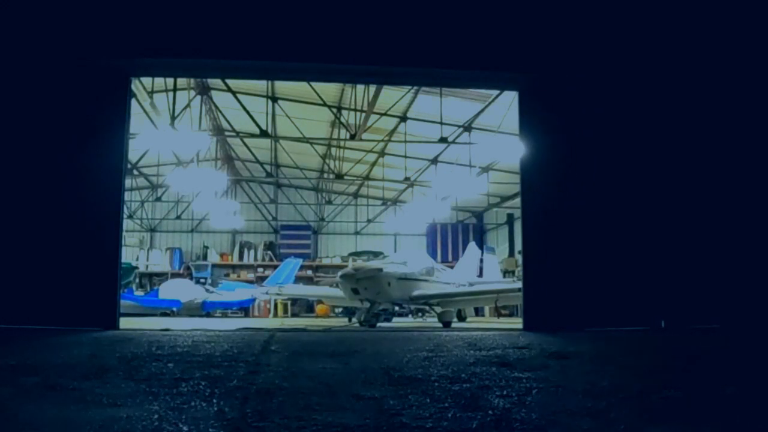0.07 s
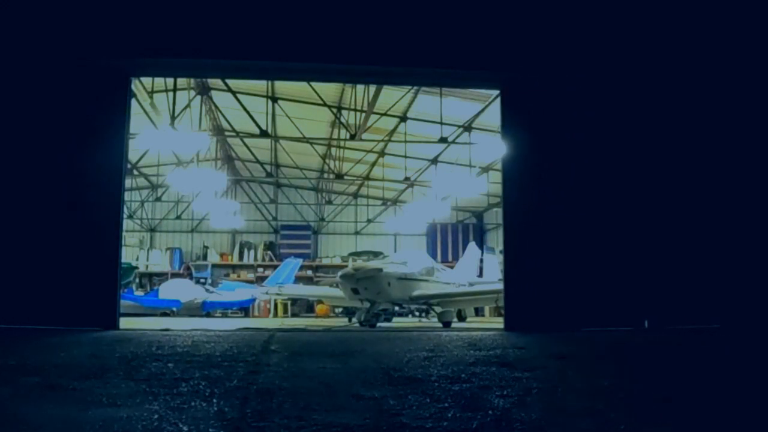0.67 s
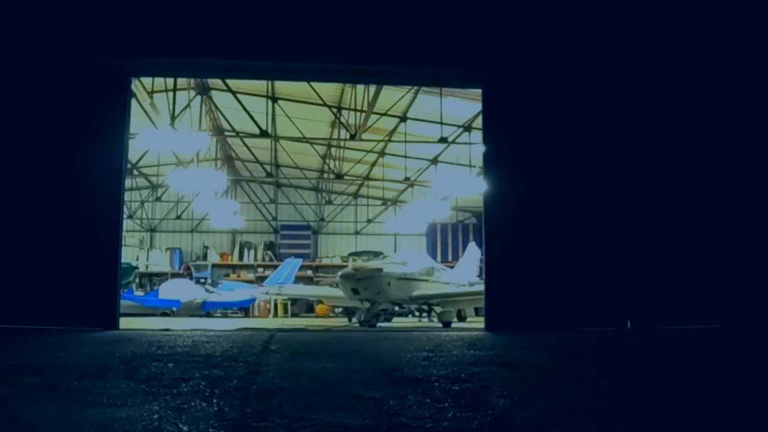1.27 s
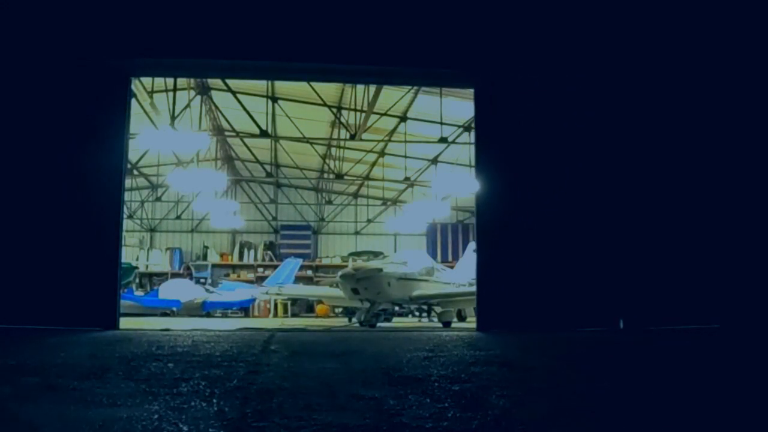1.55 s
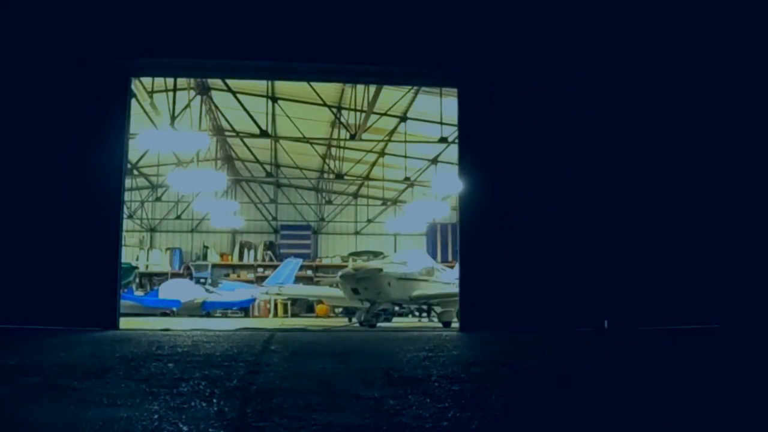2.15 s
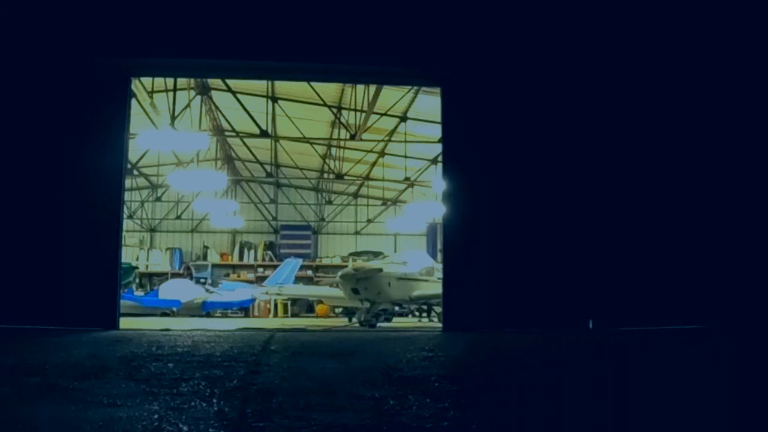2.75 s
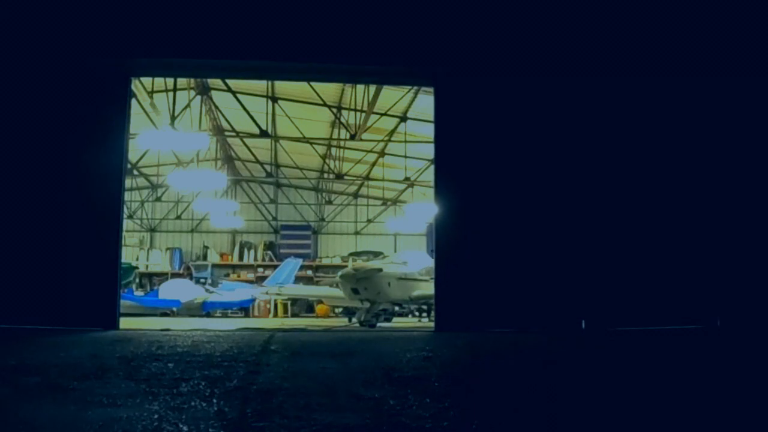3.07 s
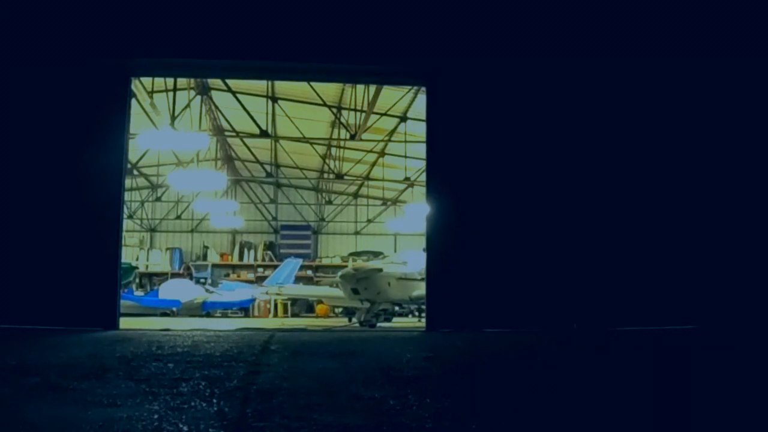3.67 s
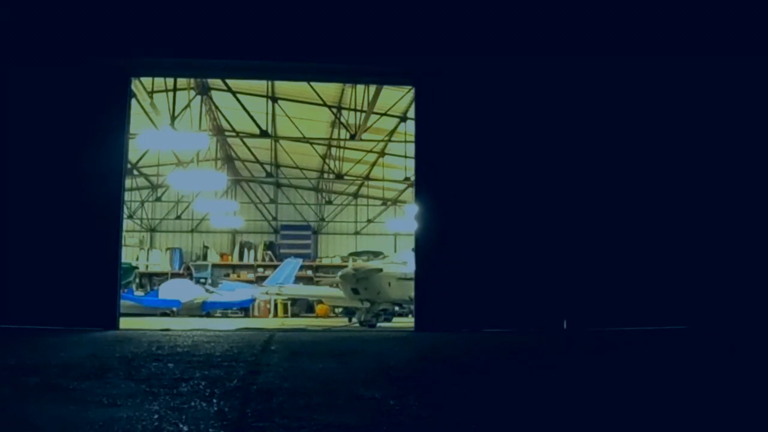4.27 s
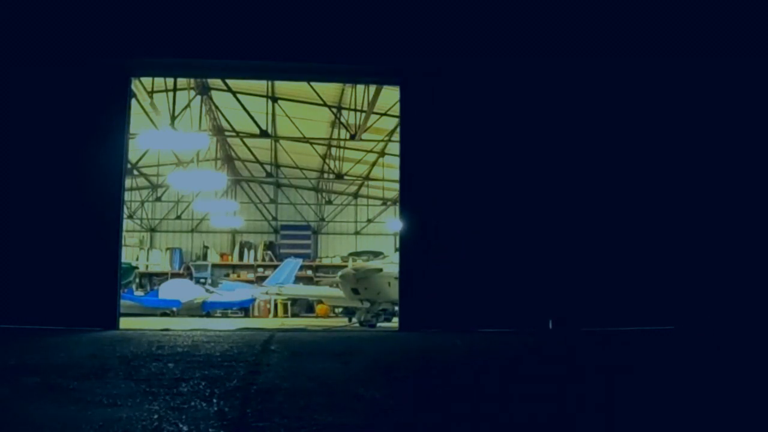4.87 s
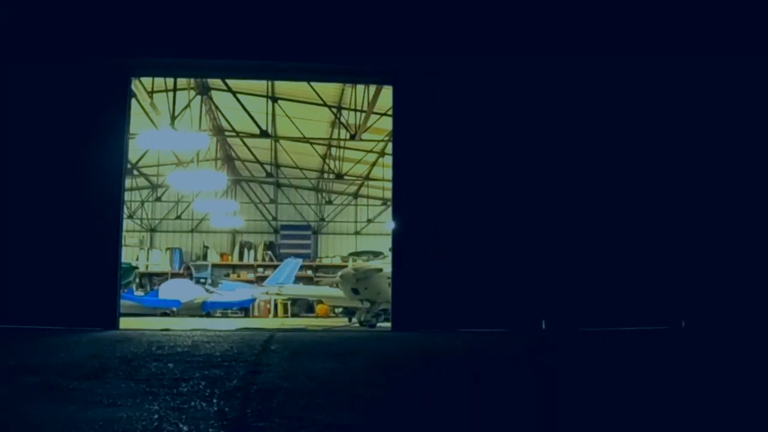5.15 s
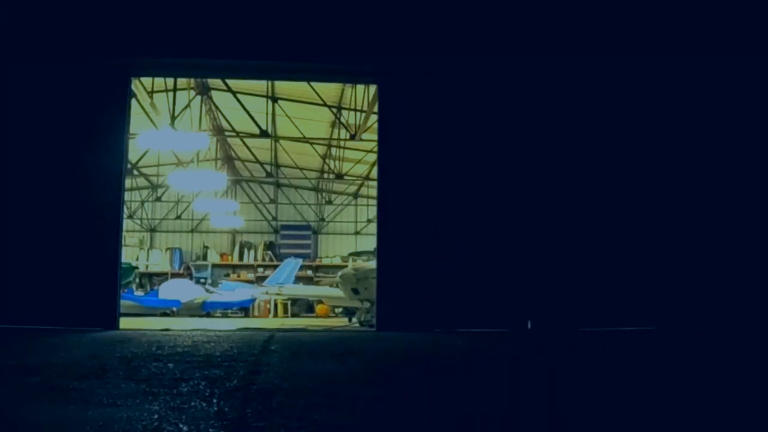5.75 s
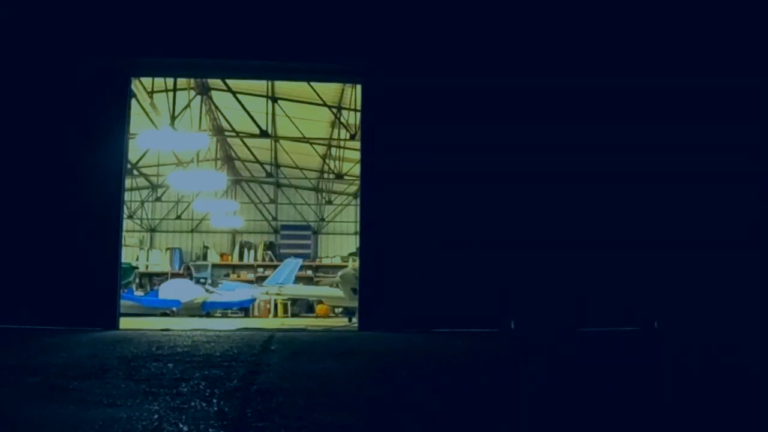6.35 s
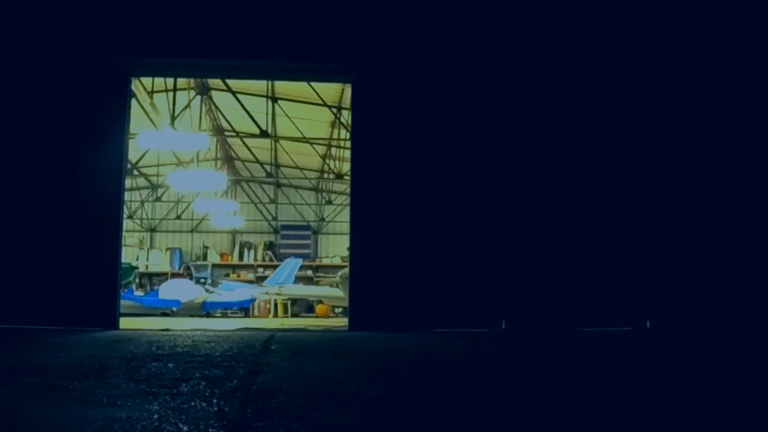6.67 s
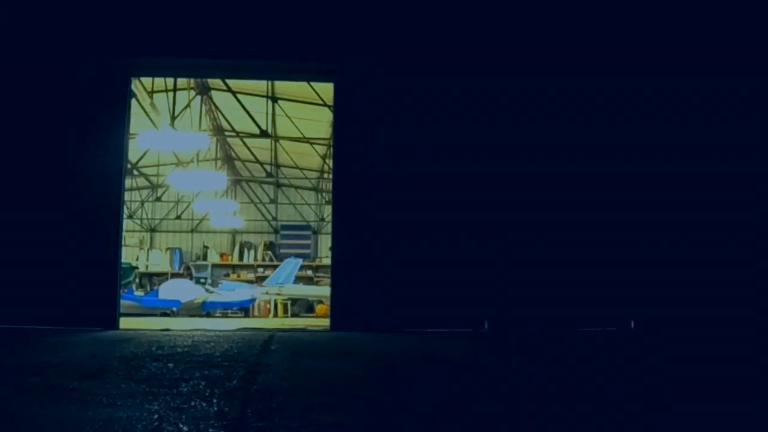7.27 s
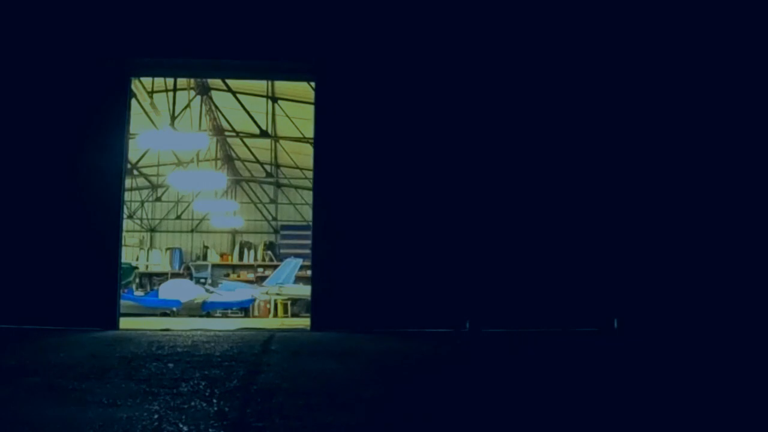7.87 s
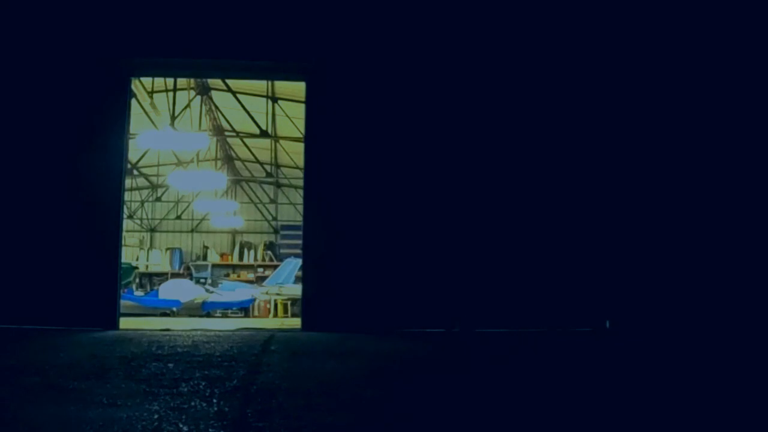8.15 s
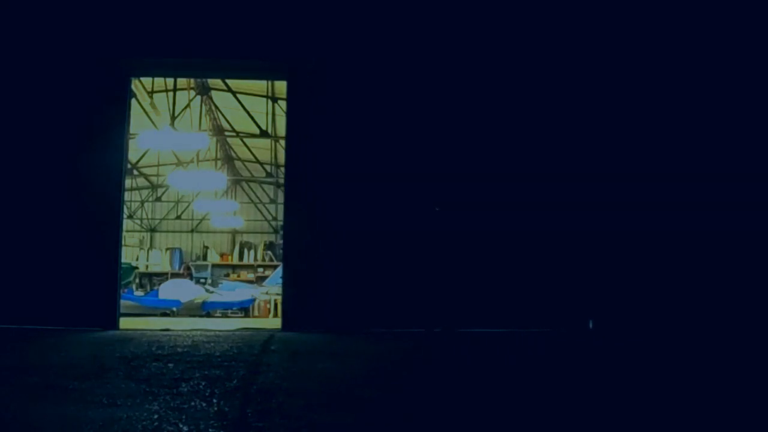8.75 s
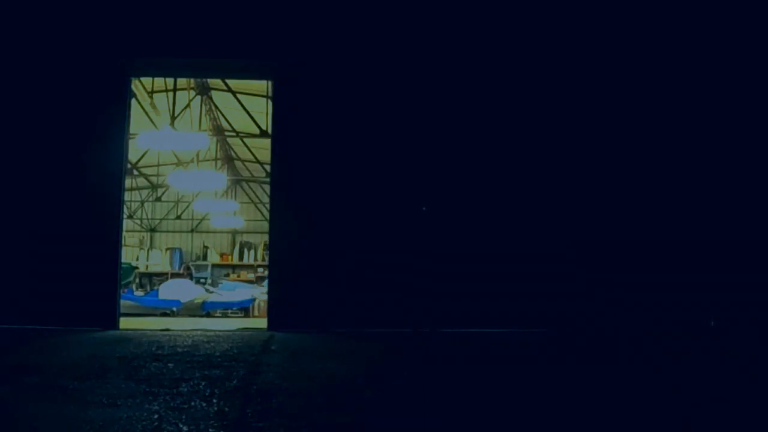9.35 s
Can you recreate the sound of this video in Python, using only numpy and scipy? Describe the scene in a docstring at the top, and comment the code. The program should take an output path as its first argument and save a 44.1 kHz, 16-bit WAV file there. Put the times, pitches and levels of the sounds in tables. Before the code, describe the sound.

A tall sheet-steel hangar door rolls shut, heard from some way off. From the start there is a deep, throbbing rumble, with thin panels drumming and a loose sheet humming. The wheels crush grit on the floor track in uneven crackles and crunches. At about 3.1 seconds they hit a rail joint with a sharp, rattling cluster of clanks, and the panels boom. A lighter cluster follows at 5.2 seconds, then a dull knock at 6. Around 6.3 seconds the close crackle drops away, and the softer, duller grinding of the far wheels takes over, joined by a very faint, high squeal from about 7 seconds. At 9 seconds another ringing clank and short rattle jolt the door, which is still rumbling at 9.5 seconds. The large hall echoes everything except the deepest rumble.

```python
"""A low, throbbing rumble with gritty crackle: a tall sheet-steel hangar door rolls shut, some way off.
Its wheels shake the panels, crush grit on the floor track and clank over the rail joints.
Then the near wheels reach clean rail, and the duller grinding of the far wheels takes over,
with a faint squeal. The hall echoes everything but the deepest rumble."""
import sys
import numpy as np
from scipy import signal
from scipy.fft import rfft, irfft
from scipy.io import wavfile
from scipy.ndimage import uniform_filter1d

SR = 44100
rng = np.random.default_rng(int(sys.argv[2]) if len(sys.argv) > 2 else 0)


def output_pcm(signal):
    """Save a mono or channel-first signal as 16-bit PCM at the path in sys.argv[1].

    Samples are clipped to [-1, 1] before scaling.
    """
    pcm = np.clip(np.atleast_2d(signal).T, -1, 1) * 32767
    wavfile.write(sys.argv[1], SR, np.round(pcm).astype(np.int16))


N = 419391
T = np.arange(N) / SR


def undb(db):
    """Turn decibels into a number to multiply by."""
    return 10 ** (np.asarray(db) / 20)


def unit(x):
    """Scale to an average strength (rms) of 1."""
    return x / np.sqrt(np.mean(x ** 2))


def curve(rows):
    """Join (time, value) points with straight lines."""
    return np.interp(T, *np.transpose(rows))


def ramp(middle_s, length_s):
    """Rise from 0 to 1 around a moment."""
    return np.clip((T - middle_s) / length_s + .5, 0, 1)


def wander(rate):
    """Glide to a new random value, rate times a second."""
    step = int(SR / rate)
    held = np.repeat(rng.standard_normal(N // step + 1), step)
    return unit(uniform_filter1d(held, step)[:N])


def add(out, start_s, x):
    """Mix x into out from start_s on."""
    i = int(start_s * SR)
    out[i:i + len(x)] += x[:N - i]


def at_hz(hz, points):
    """Read between (frequency, value) points, spaced by octaves."""
    known_hz, value = np.transpose(points)
    return np.interp(np.log(np.maximum(hz, 1)), np.log(known_hz), value)


def colour(x, tone, tilt_db=0, size=8192):
    """Filter x by a tone table, fading past its ends; tilt_db per octave tips the treble."""
    hz = np.maximum(np.arange(size // 2 + 1) * SR / size, 1)
    octaves_outside = np.abs(np.log2(hz / np.clip(hz, tone[0][0], tone[-1][0])))
    db = at_hz(hz, tone) - 20 * octaves_outside + tilt_db * np.log2(np.maximum(hz, 1000) / 2000)
    # Fold the filter so that nothing sounds before the hit that causes it.
    cepstrum = irfft(np.log(undb(db)))
    cepstrum[1:size // 2] *= 2
    cepstrum[size // 2 + 1:] = 0
    return signal.fftconvolve(x, irfft(np.exp(rfft(cepstrum))))[:len(x)]


def resonate(x, hz, width_hz):
    """Keep one band of x, so it rings at that pitch."""
    return signal.lfilter(*signal.iirpeak(hz, hz / width_hz, fs=SR), x)


def grains(rate, spread_db):
    """Tiny random impacts, about rate a second, a few much harder than the rest."""
    hits = rng.random(N) < rate / SR
    return hits * rng.choice([-1, 1], N) * undb(spread_db * np.minimum(rng.exponential(size=N), 5))


def chatter(length_s, rise_s=0.002):
    """A quick run of tiny contacts that stops short."""
    t = T[:SR // 10]
    shape = (1 - np.exp(-t / rise_s)) * np.exp(-(t / length_s) ** np.sqrt(2) / 2)
    burst = rng.standard_normal(len(t)) * shape
    return burst / np.linalg.norm(burst)


def struck(x, tone, tilt_db, peak_hz, boost_db, sharpness=4.7):
    """A struck part colours the blow x and favours one pitch."""
    response = colour(signal.unit_impulse(2048), tone, tilt_db)
    response = response + (undb(boost_db) - 1) * resonate(response, peak_hz, peak_hz / sharpness)
    return signal.fftconvolve(x, response / np.linalg.norm(response)) * np.sqrt(SR / 100)


# The hall's echo. Each row: frequency in Hz, seconds to fade by 60 dB, level in dB.
HALL_ECHO = [(125, 1.35, 2), (500, 1.45, 0), (1000, 1.55, -2.5), (1980, 1.06, -4), (3980, 1.15, -5),
             (8000, 2, -4.5), (15700, .7, -6.5)]
def hall_tail(build_s=0.026):
    """Echoes build up between floor, walls and roof; each octave fades at its own speed."""
    t = T[:SR]
    noise = rfft(rng.standard_normal(len(t)))
    octave = np.log2(np.clip(np.arange(len(noise)) * SR / len(t), 125, 16000) / 125)
    tail = 0
    for k in range(8):
        fade_s, db = (at_hz(125 * 2 ** k, np.array(HALL_ECHO)[:, [0, c]]) for c in (1, 2))
        fade = undb(-60 * t / fade_s) * (1 - np.exp(-t / build_s))
        band = irfft(noise * np.maximum(1 - np.abs(octave - k), 0))
        tail = tail + band * fade * undb(db) / np.linalg.norm(fade)
    return tail


def hall(x):
    """The echo pattern keeps changing as the door travels."""
    out, hop = np.zeros(N), SR // 2
    window = np.sqrt(np.hanning(2 * hop))
    for i in range(-hop, N, hop):
        start, end = max(i, 0), min(i + 2 * hop, N)
        piece = x[start:end] * window[start - i:end - i]
        add(out, start / SR, signal.fftconvolve(piece, hall_tail()))
    return out


# Thin squeals. Each row: start and end in seconds, pitch in Hz, relative level in dB.
SQUEALS = [(6.85, 7.6, 4950, -82), (7.697, 9.0, 3840, -74.5), (8.203, 9.0, 4730, -82),
           (8.4, 9.4, 5670, -85)]
def squeals(fade_s=.3, waver_db=2):
    """A wheel's rim rubs the rail and keeps the wheel ringing."""
    out, rubbing = np.zeros(N), rng.standard_normal(N)
    for start, end, hz, db in SQUEALS:
        ring = unit(resonate(rubbing, hz, width_hz=150))
        fade = ramp(start, fade_s) * (1 - ramp(end, fade_s))
        out += undb(db + waver_db * wander(8)) * ring * fade
    return out


# The tone of the distant grinding. Each row: frequency in Hz, level in dB.
FAR_TONE = [(250, -3.5), (500, -1.5), (720, -0.5), (930, -4.5), (1150, -3.5), (1750, -7.5), (2000, -9),
            (2700, -13), (3100, -12.5), (3600, -19.5), (3900, -17), (4150, -24.5), (4900, -28),
            (7500, -48.5)]
# Patches of grit. Each row: middle in seconds, reach to either side in seconds, extra level in dB.
GRIT_PATCHES = [(7.27, 0.12, 1), (7.78, 0.2, 3.5), (7.98, .06, 3), (8.28, .06, 2), (8.47, 0.082, 3.2),
                (8.85, .05, 1.5)]
def far_wheels():
    """Distant wheels grind on, dull at first, then louder and brighter as they meet more grit."""
    patch_db = sum(db * np.exp(-((T - s) / reach_s) ** 2) for s, reach_s, db in GRIT_PATCHES)
    level_db = -54 + 5 * ramp(middle_s=6.3, length_s=1.3) + patch_db
    treble_db = -17 + 15.5 * ramp(middle_s=6.82, length_s=.5)
    grit = unit(colour(grains(3500, 2.0) * undb(1.7 * wander(25)), FAR_TONE))
    treble = signal.sosfiltfilt(signal.butter(3, 2000, "high", fs=SR, output="sos"), grit)
    return (grit + (undb(treble_db) - 1) * treble) * undb(level_db)


# A loose sheet's hum. Each row: time in seconds, relative level in dB.
SHEET_LEVELS = [(0, -47.5), (1.3, -51), (1.55, -41.5), (1.85, -51), (3.1, -54.5), (3.25, -37), (3.7, -53),
                (5.15, -53), (5.3, -39.5), (5.95, -47.5), (6.5, -40.5), (6.7, -49), (7.0, -43),
                (7.4, -48.5), (8.1, -46), (8.9, -52), (9.1, -42), (9.5, -50)]
def loose_sheet(hz=270.8, width_hz=26):
    """One loose sheet of the door's skin hums at its own pitch."""
    hum = resonate(rng.standard_normal(N), hz, width_hz)
    hum = resonate(hum, hz, width_hz)  # a second pass narrows the band
    strength = np.sqrt(uniform_filter1d(hum ** 2, SR // 5) + 1e-12)
    return unit(hum / strength) * undb(curve(SHEET_LEVELS))


# The notes of track and frame. Each row: pitch in Hz, relative level in dB,
# seconds to fade by 60 dB when ringing freely.
STEEL_NOTES = [(389, -2, .6), (572, -2.5, .7), (606, -2.5, 1.2), (720, -7, 0.43), (850, -6.5, 1.2),
               (1040, -4.5, .6), (1148, -1.5, 0.92), (1206, -2.5, 1.1), (1360, -5, .7), (1490, -3, .7),
               (1618, 1.5, .4), (1690, -3, .9), (1775, -4.5, .8), (2097, -3, 1.3), (2448, -1.5, .6),
               (2780, -9.5, .5), (3200, -4.5, .7), (3800, -6, .5), (4130, -5.5, 0.45), (4960, -3.5, .5)]
def shaken_steel(x, ring_db, damping_s, wander_db):
    """Shaking sets the steel ringing; the wheels damp it and favour other notes as they travel."""
    out = x
    for hz, db, fade_s in STEEL_NOTES:
        width_hz = (1 / damping_s + np.log(1000) / fade_s) / np.pi
        out = out + undb(ring_db + db + wander_db * wander(3)) * resonate(x, hz, width_hz)
    return out


def clang(struck_hz, reach_octaves=0.62, scatter_db=2.5, rise_s=0.0031):
    """The steel rings on after a blow, most in the notes near the struck part's pitch."""
    out, t = 0, T[:SR]
    for hz, db, fade_s in STEEL_NOTES:
        luck, phase = rng.standard_normal(2)
        closeness = np.exp(-(np.log2(hz / struck_hz) / reach_octaves) ** 2)
        note = np.sin(2 * np.pi * (hz * t + phase))
        out = out + closeness * note * undb(db + scatter_db * luck - 60 * t / fade_s)
    return out * (1 - np.exp(-t / rise_s))


# The tone of grit on the near rail. Each row: frequency in Hz, level in dB.
NEAR_TONE = [(250, -16.5), (500, -5), (720, -4.5), (930, -8), (1030, -2), (1150, -0.5), (1470, -3.5),
             (1650, -4), (1950, -5), (3600, -10), (4150, -16.5), (6000, -21), (7200, -28), (9600, -35.5),
             (11500, -52)]
# The near grinding. Each row: time in seconds, relative level in dB.
GRIT_LEVELS = [(0, -40), (.3, -44.5), (.8, -43.5), (1.1, -40), (1.25, -44), (1.4, -40), (1.8, -42),
               (2.05, -45), (2.3, -45), (2.6, -46), (2.9, -45), (3.15, -41), (3.85, -49), (4.4, -50),
               (4.75, -45), (4.97, -50.5), (5.2, -44.5), (5.55, -47), (6.18, -47.5), (6.45, -66),
               (6.9, -57.5), (9.5, -62)]
# Moments when the grit briefly crunches louder, in seconds.
SURGE_TIMES = [3.144, 4.4]
def near_wheels(lead_s=0.0049, reach_s=0.015, surge_db=5.5, dust_db=-70.5):
    """The near wheels crush grit in uneven flurries, twice briefly louder."""
    surge = sum(np.exp(-((T - s + lead_s) / reach_s) ** 2) for s in SURGE_TIMES)
    crushing = grains(4000, 1.4) * undb(2.45 * np.tanh(wander(60)))
    grit = unit(colour(crushing, NEAR_TONE))
    treble = signal.sosfiltfilt(signal.butter(2, 4200, "high", fs=SR, output="sos"), grit)
    treble_db = -4.5 + 1.5 * wander(8.2)  # sharper grit sounds brighter
    grit = grit + (undb(treble_db) - 1) * treble
    dust = undb(dust_db) * treble  # fine dust hisses even on clean rail
    return grit * undb(curve(GRIT_LEVELS) + surge_db * surge) + dust


# Cracking grains. Each row: start in seconds, relative level in dB, treble tilt in dB per octave.
CRUNCHES = [(.045, -41, 1.5), (.415, -40, 1), (.455, -43, 1.5), (.668, -40, 1), (.678, -36.5, 1.5),
            (.953, -41, -1.5), (.993, -41.5, 3.5), (1.055, -45, 3), (1.08, -42, -3), (1.132, -45, 3),
            (1.311, -41, 0.5), (1.337, -43.5, 2), (1.375, -42, .5), (1.412, -42.5, 3), (1.445, -45, 5),
            (1.479, -43, 2), (1.599, -41, 2.5), (1.65, -41, 1), (1.729, -43, 1), (1.812, -47, 0),
            (1.995, -39.5, 0), (2.118, -43, 1), (2.196, -38, 0), (2.27, -48, 2), (2.354, -43, -1),
            (2.41, -52, 7), (2.742, -39, 1), (2.87, -48, 0.5), (2.975, -46, 1), (3.045, -42, 0),
            (3.953, -42, 1), (3.996, -42.5, -0.5), (4.664, -47, -1), (4.72, -45, -5), (4.76, -44, -5),
            (4.795, -43.5, -6), (5.48, -45, 4.5), (5.572, -51, 3), (5.654, -48, 3), (5.903, -44, 1),
            (5.993, -46, 0), (6.086, -40.5, 0), (6.162, -44, 1.5), (6.243, -56, 3), (6.335, -58, 5),
            (6.558, -61, 7), (6.76, -55, -2)]
def crunches(middle_hz=3020, scatter_octaves=0.17):
    """Larger grains burst under a wheel, each a short scrape in its own broad band."""
    out = np.zeros(N)
    for start, db, tilt_db in CRUNCHES:
        hz = middle_hz * 2 ** (scatter_octaves * rng.standard_normal())
        scrape = struck(chatter(0.014), NEAR_TONE, tilt_db, hz, boost_db=4.5, sharpness=2.2)
        add(out, start, undb(db) * scrape)
    return out


# The tone of a struck joint. Each row: frequency in Hz, level in dB.
JOINT_TONE = [(100, -0.5), (280, 4), (450, 1), (650, 0.5), (880, -1), (1200, 3), (2300, -3), (3400, -4),
              (4300, -11), (6000, -15), (7500, -24), (9800, -32), (11500, -46), (15000, -49.5)]
# Metal blows. Each row: start in seconds, relative level in dB, treble tilt in dB per octave,
# chatter length in seconds, favoured pitch in Hz, its boost in dB, relative echo level in dB.
CLANKS = [(3.143, -23, 1.7, 0.0077, 2680, 2, 1), (3.16, -35, -9, 0.0072, 1330, 15, 1),
          (3.181, -31, 1.5, 0.006, 3300, 3, 4), (3.198, -33.5, -4, .005, 1650, 14, 2),
          (3.211, -37, -1, .005, 3250, 11, -1), (3.234, -24.5, -3, 0.0024, 2150, 21, -5),
          (3.247, -31, -4, 0.009, 1080, 5, 1.5), (3.259, -35, -5, .004, 1500, 9, -2),
          (3.274, -34.5, -5, .006, 1160, 13, 0.5), (3.291, -36, -1, 0.0045, 1250, 10, -3),
          (3.303, -35.5, 0.5, .014, 3000, 4, 2), (3.318, -40, -4, 0.0062, 1290, 12, -4),
          (5.227, -31.5, 1, 0.006, 1640, 11, 2), (5.237, -35.5, 3, .006, 4800, 4, 1),
          (5.244, -36, -1.5, 0.0058, 3000, 7, 3), (5.251, -35, -3, 0.0054, 1140, 13, 0),
          (5.265, -41, -1.5, .009, 2200, 6, 0), (5.284, -36.5, -0.5, 0.0048, 3800, 8, 0),
          (5.303, -33.5, -1, 0.007, 1550, 6, -3), (5.311, -33.5, -.5, .007, 2150, 9, 2),
          (5.317, -35.5, -0.5, .008, 3200, 7, -.5), (6.044, -34, -14, 0.0034, 430, 21, -4),
          (9.013, -35, -2.5, 0.009, 760, 7, 2), (9.019, -26.5, -2.5, 0.0105, 1450, 6, 0),
          (9.021, -34.5, -8, 0.0098, 370, 16, 1), (9.022, -54.5, 9, .008, 13200, 22, 0),
          (9.022, -40, -.5, 0.0091, 5500, 14, -2), (9.023, -39, -2, .005, 3800, 16, -1),
          (9.043, -34.5, -2, .011, 4330, 15, 3.5), (9.072, -38, -3, 0.0082, 1650, 9, 4),
          (9.1, -35, -4, 0.022, 796, 8, 1), (9.122, -39.5, -1.5, 0.015, 1720, 7, 0),
          (9.165, -38.5, -2.5, .01, 2500, 4, 2), (9.203, -34.5, -9, .02, 290, 15, 3)]
def clanks(rebound_s=.03, scatter_s=.004, loss_db=14, clang_db=-22):
    """Wheels drop into joints and the door knocks in its guides; each blow rebounds once, weaker."""
    blows, rings = np.zeros(N), np.zeros(N)
    for start, db, tilt_db, length_s, hz, boost_db, echo_db in CLANKS:
        echoes = hall_tail(build_s=0.0075)  # each spot has its own echoes
        add(rings, start, undb(db + clang_db) * clang(hz))
        for bounce in range(2):
            blow = undb(echo_db) * echoes
            add(blow, 0, chatter(length_s))
            delay_s = bounce * (rebound_s + scatter_s * rng.standard_normal())
            knock = struck(blow, JOINT_TONE, tilt_db, hz, boost_db)
            add(blows, start + delay_s, undb(db - bounce * loss_db) * knock)
    return undb(-1.5) * shaken_steel(blows, ring_db=-1.5, damping_s=0.02, wander_db=1.1) + rings


# The tone of the door's thin skin. Each row: frequency in Hz, level in dB.
SKIN_TONE = [(80, -18), (125, 1), (140, 1), (180, -2), (280, -5.5), (340, -7), (390, -10.5), (440, -16),
             (620, -22.5), (800, -40), (1100, -34.5), (3000, -74)]
# Its drumming. Each row: time in seconds, level in dB.
DRUM_LEVELS = [(0, -32.5), (.6, -35.5), (1.5, -34), (1.9, -37.5), (2.8, -36.5), (3.6, -36), (4.0, -37),
               (5.0, -37.5), (5.6, -35), (6.05, -34.5), (6.5, -39), (7.15, -37), (7.9, -38.5), (8.5, -41.5),
               (9.5, -41.5)]
# Jolts from rail joints. Each row: time in seconds, size of the swell in dB.
JOLTS = [(3.2, 9.5), (5.25, 6), (9.04, 12)]
def drumming_skin(rise_s=0.036, settle_s=0.2):
    """Rough rail makes the thin skin drum, harder for a moment after a jolt."""
    jolt_db = sum(db * ramp(s, rise_s) * np.exp(-np.maximum(T - s, 0) / settle_s) for s, db in JOLTS)
    drum = unit(colour(grains(900, 1.75), SKIN_TONE))
    return drum * undb(curve(DRUM_LEVELS) + jolt_db)


# Each row: start in seconds, level in dB, pitch in Hz.
LOW_SWELLS = [(.09, -26, 85.3), (0.444, -22, 91.4), (0.929, -25.5, 191), (1.138, -22, 87.2),
              (1.669, -22, 70.3), (1.81, -26, 82), (2.09, -25.5, 89), (2.199, -26, 145), (2.471, -30, 87),
              (2.62, -26, 85), (3.05, -22.5, 85), (3.245, -26, 275), (3.262, -21, 93), (4.18, -23, 73),
              (4.68, -24, 90.5), (4.86, -24.5, 92), (5.271, -25, 272), (5.41, -29, 89), (5.91, -25, 54.6),
              (6.042, -23.5, 139), (6.731, -29.5, 87), (7.11, -25, 93), (7.529, -29.5, 90),
              (7.83, -30.5, 90), (8.04, -27.5, 90), (8.439, -27, 87.6), (8.55, -26, 87), (9.025, -23, 88),
              (9.09, -29, 210), (9.111, -24, 96), (9.125, -28.5, 265), (9.19, -29, 190), (9.421, -26, 90)]
def low_swells(cycles_to_peak=1.29):
    """Short low swells of the rumble, and a few dull thumps, each a few cycles long."""
    out, t = np.zeros(N), T[:SR // 2]
    for start, db, hz in LOW_SWELLS:
        swell = t * hz / cycles_to_peak
        add(out, start, undb(db) * swell * np.exp(1 - swell) * np.sin(2 * np.pi * hz * t))
    return out


def swing(tone, inertia_s):
    """Small bumps keep a heavy part swinging; its weight evens out their strength."""
    motion = colour(grains(900, 0.69), tone, size=32768)
    power = uniform_filter1d(motion ** 2, int(inertia_s * SR)) + 1e-12
    return unit(motion / power ** 0.53)


# The tones of the frame and the main panel. Each row: frequency in Hz, level in dB.
FRAME_TONE = [(10, -22.5), (22, -8.5), (32, -1.5), (45, -2.5), (58, 3.5), (68, 1.5), (76, -2.5), (88, -13),
              (110, -32.5), (190, -37)]
PANEL_TONE = [(55, -26.5), (72, -6.5), (81, -9), (87, 0.5), (95, -1), (104, -8.5), (118, -15), (170, -35)]
# How loud each is as the door rolls. Each row: time in seconds, level in dB.
FRAME_LEVELS = [(0, -35), (1.1, -31), (1.5, -37.5), (1.75, -31), (2.7, -36.5), (3.15, -28.5), (3.85, -36.5),
                (4.5, -34.5), (4.75, -28.5), (5.02, -37), (5.25, -28), (6.05, -32.5), (6.4, -39),
                (7.4, -35.5), (8.7, -38.5), (9.0, -32.5), (9.5, -33.5)]
PANEL_LEVELS = [(0, -36), (1.2, -34), (2.0, -32.5), (3.3, -32), (3.85, -38), (4.8, -30.5), (5.5, -34),
                (6.5, -37), (7.9, -36), (8.6, -31), (9.5, -34.5)]
# The low rumble swells and sinks at two slow rates. # Each row: swells per second, time of one crest in
# seconds, depth in dB.
THROBS = [(2.89, 0.14, 2), (2.06, 0.34, 2)]
def rumble(wander_db=1.47):
    """Rough rail pushes the wheels, so the frame booms and the main panel drones."""
    throb_db = sum(db * np.cos(2 * np.pi * hz * (T - crest_s)) for hz, crest_s, db in THROBS)
    panel_db = curve(PANEL_LEVELS) + throb_db + wander_db * wander(6)
    frame = swing(FRAME_TONE, inertia_s=0.19) * undb(curve(FRAME_LEVELS))
    panel = swing(PANEL_TONE, inertia_s=0.11) * undb(panel_db)
    return frame + panel


def scene():
    """Mix the rolling door with its echo in the hall, in one channel."""
    boom, drum = rumble(), drumming_skin()
    crushing = near_wheels() + crunches()
    grit = undb(-1.5) * shaken_steel(crushing, ring_db=-7.0, damping_s=0.011, wander_db=3.0)
    panels = drum + low_swells() + undb(-2.7) * loose_sheet()
    far = far_wheels() + squeals()
    direct = boom + panels + grit + undb(-1) * far
    echo = hall(undb(-6) * panels + undb(-2.0) * grit + undb(-1.5) * far)
    return (direct + echo + clanks())[None]


def record(dry):
    """Cut the treble above 14400 Hz."""
    return signal.sosfilt(signal.ellip(8, .2, 70, 14400, fs=SR, output="sos"), dry)


dry = scene()
out = record(dry)
output_pcm(out)
```